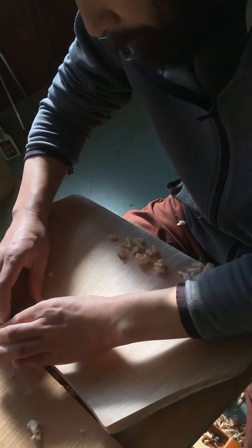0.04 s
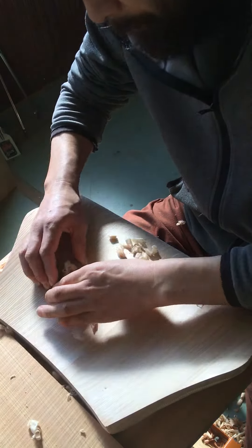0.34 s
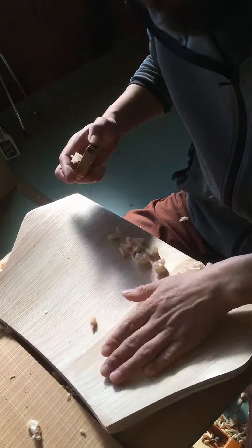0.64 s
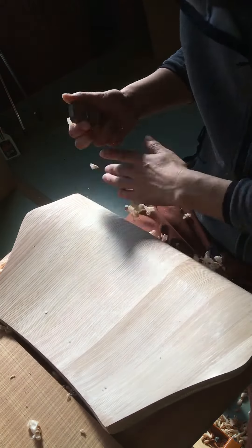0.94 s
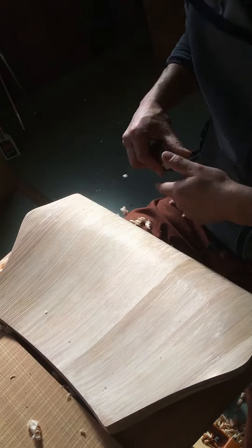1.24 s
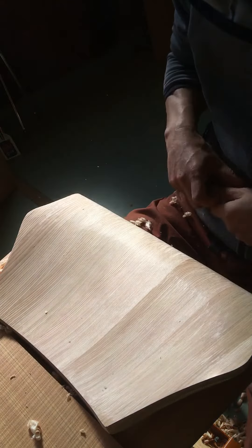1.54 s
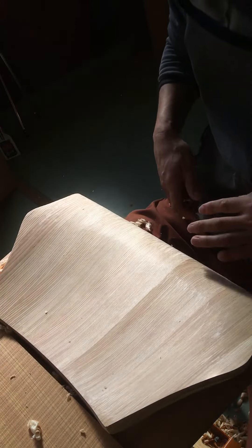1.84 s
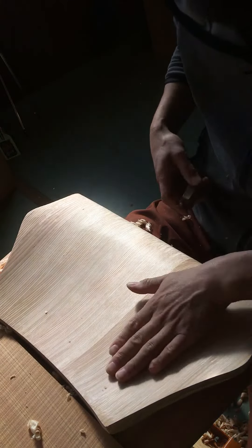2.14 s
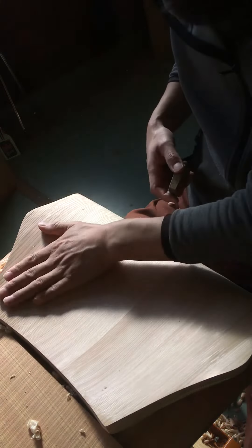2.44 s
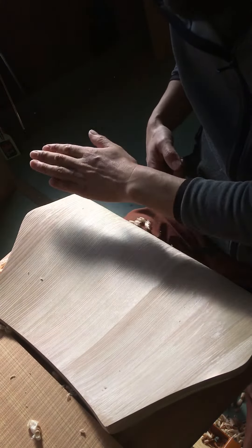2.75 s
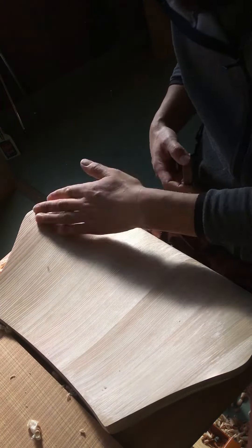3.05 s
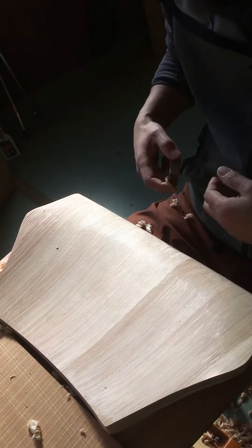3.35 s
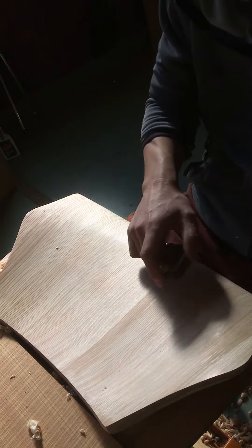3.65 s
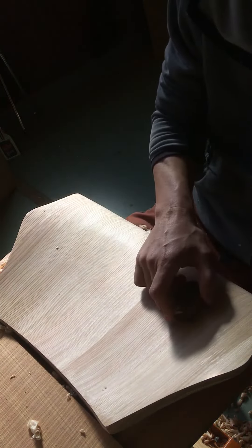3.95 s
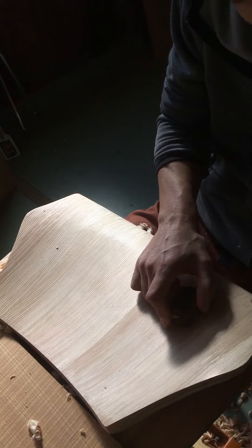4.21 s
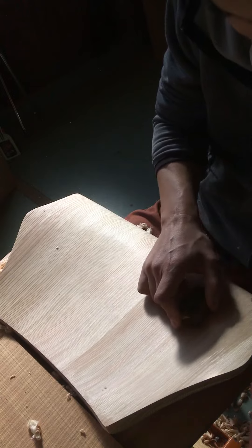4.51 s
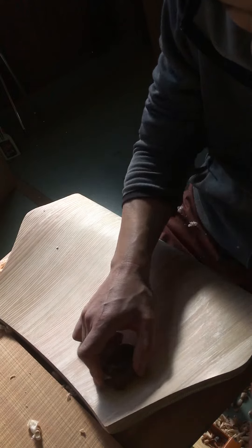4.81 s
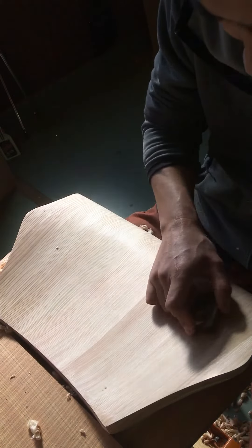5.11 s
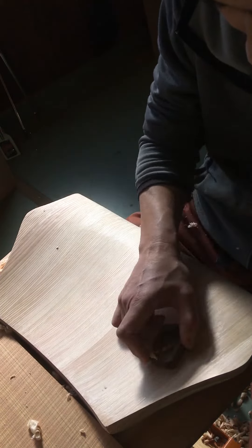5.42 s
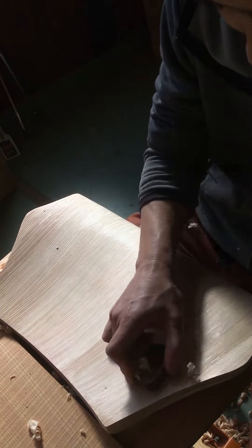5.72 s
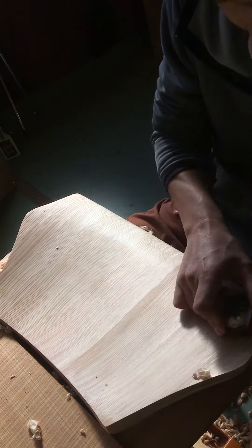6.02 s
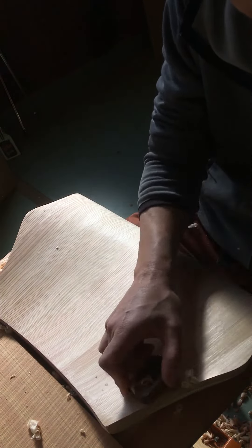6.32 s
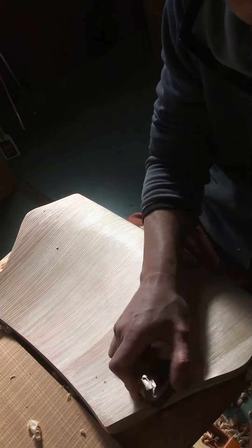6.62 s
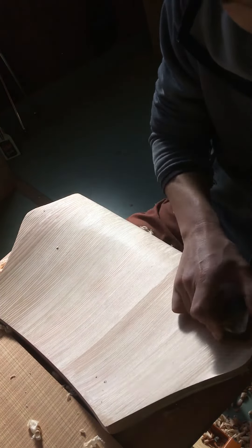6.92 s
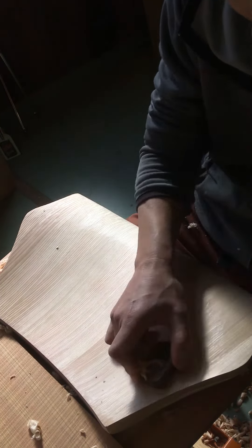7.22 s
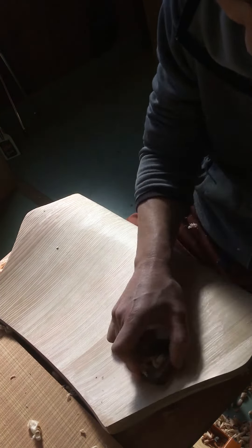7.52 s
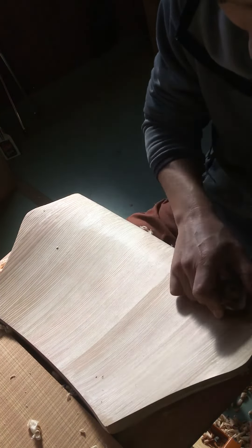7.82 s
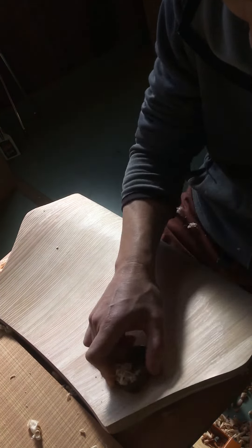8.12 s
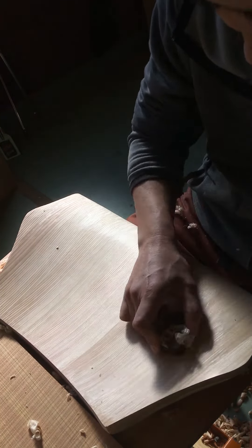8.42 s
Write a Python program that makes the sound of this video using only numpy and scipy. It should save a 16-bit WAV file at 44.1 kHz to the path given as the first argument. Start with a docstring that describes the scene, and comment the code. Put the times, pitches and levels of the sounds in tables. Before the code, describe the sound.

In a quiet workshop, a small hand plane makes a few light, squeaky scrapes on a thin wooden plate. A woody knock follows, and a hand wipes shavings off with two soft hisses. After faint scrapes and taps, the plane works back and forth about twice a second, each push crisply tearing fibres and each return rubbing with a hollow tone. Everything is heard close.

```python
"""A thumb plane hollows a thin carved wooden plate in a quiet workshop, heard close.
Light rim scrapes rasp and squeak. A hand pats the plate, wipes it and gathers the shavings.
The plane settles with faint scrapes, then from 4.3 s works to and fro about twice a second:
each push tears fibres and rings blade and plate, each return drags the sole under the cupped hand."""
import sys
import numpy as np
from scipy import signal
from scipy.fft import rfft, irfft, next_fast_len
from scipy.io import wavfile
from scipy.ndimage import uniform_filter1d, map_coordinates

SR = 44100
rng = np.random.default_rng(int(sys.argv[2]) if len(sys.argv) > 2 else 0)


def transcribe(u):
    """Save the signal u as a 16-bit wav file named by the first command-line argument.

    u: samples, shape (n,) or (channels, n), limited to [-1, 1]; the rate is SR.
    q: integer samples, one column per channel.
    """
    v = np.clip(np.atleast_2d(u).T, -1, 1)
    q = np.round(v * 32767).astype(np.int16)
    wavfile.write(sys.argv[1], SR, q)


N = 373086
TIME = np.arange(N) / SR
SIZE = next_fast_len(N + SR)
HZ = np.fft.rfftfreq(SIZE, 1 / SR)

# rim scrapes, then the plane settling: start_s, rise_s, hold_s, fall_s, rasp_db, drag_db
SCRAPES = [(0.0, .004, .105, .06, -64, -58), (.179, .025, .1, .15, -48, -51.5),
           (.36, .035, .018, .055, -56.5, -49.5), (3.295, .042, .08, .14, -70, -71.5),
           (3.568, .036, .096, .2, -75, -76), (3.759, .06, .032, .2, -64.5, -64.5),
           (3.93, .085, .022, .03, -65, -64), (4.127, .058, .04, .058, -71.5, -70)]
SCRAPE_ENTRY_DB = 7
# plate resonances under the tool: centre_hz, width_hz, gain_db
PLATE_MODES = [(453, 28, -2.5), (706, 19, -2.5), (1000, 70, -3), (1119, 20, 0.5), (1612, 50, -0.5),
               (2128, 65, -3), (2726, 246, -13)]
# flexing modes of the whole plate: pitch_hz, gain_db, t60_s
FLEX_MODES = [(63, -6, 0.45), (80.5, 3, 0.36), (101.6, -1, 0.23), (114.6, -5.5, .35), (138, -9, .25),
              (175.7, -9.5, 0.46), (217, -6, 0.41), (236, -7, 0.3), (312, -8, 0.16), (462, -12.5, 0.23)]
# blade resonances: centre_hz, width_hz, gain_db
BLADE_MODES = [(4715, 50, -13), (7085, 240, 1), (11400, 1700, -12)]
# pushes of the plane: start_s, dig_s, cut_s, tear_db, drag_db
PUSHES = [(4.511, .19, .028, -51.5, -52), (5.146, .08, .005, -44.5, -48.5),
          (5.623, .055, .04, -40.5, -49.5), (6.101, .05, .056, -39.5, -49), (6.569, .018, .048, -36, -49.5),
          (6.991, .085, .006, -41, -48.5), (7.46, .035, .045, -40, -49.5), (7.93, .045, .04, -42.5, -49),
          (8.387, .06, .05, -43.5, -47.5)]


def amp(db):
    """Decibels to gain."""
    return 10 ** (np.asarray(db) / 20)


def unit(x):
    """Scale to rms 1."""
    return x / np.sqrt(np.mean(x ** 2) + 1e-20)


def filtered(x, response):
    """Apply a frequency response."""
    return irfft(rfft(x, SIZE) * response, SIZE)[:N]


def passed(x, response):
    """Filter, keeping the power of a white input."""
    return filtered(x, response / np.sqrt(np.mean(abs(response) ** 2)))


def colour(points):
    """Minimum-phase response through (freq_hz, gain_db) points."""
    hz, db = np.transpose(points)
    cepstrum = irfft(np.log(amp(np.interp(np.log(HZ + 1), np.log(hz), db))), SIZE)
    cepstrum[1:SIZE // 2] *= 2
    cepstrum[SIZE // 2 + 1:] = 0
    return np.exp(rfft(cepstrum))


def resonances(modes):
    """Response of (centre_hz, width_hz, gain_db) band-passes, alternating in sign."""
    return sum((-1) ** k * amp(db) * 1j * HZ * width / (hz * hz - HZ ** 2 + 1j * HZ * width)
               for k, (hz, width, db) in enumerate(modes))


def wobble(rate_hz):
    """Random curve, linear between knots."""
    return map_coordinates(rng.standard_normal(int(N * rate_hz / SR) + 4), [TIME * rate_hz], order=1)


def envelope(strokes, entry_db, curve=1, edge_s=.008):
    """Stroke gain: enter entry_db low, swell, hold, lose 20 dB per fall_s."""
    power, t = np.zeros(N + SR), np.arange(SR) / SR
    for start_s, rise_s, hold_s, fall_s, level_db in strokes:
        swell_db = -entry_db * np.maximum(1 - t / rise_s, 0) ** curve
        fade_db = -20 * np.maximum(t - rise_s - hold_s, 0) / fall_s
        onset = np.minimum(t / edge_s, 1)
        power[max(round(start_s * SR), 0):][:SR] += amp(level_db + swell_db + fade_db) ** 2 * onset
    return np.sqrt(power[:N])


def grains(rate_hz, spread_db):
    """Tiny slips or breaks, random in time and size."""
    impulses = (rng.random(N) < rate_hz / SR) * np.sign(rng.standard_normal(N))
    return unit(impulses * amp(spread_db * rng.standard_normal(N)))


def bursts(rows):
    """Decaying noise bursts."""
    out, t = np.zeros(N + SR), np.arange(SR // 2) / SR
    for start_s, level_db, t60_s in rows:
        out[round(start_s * SR):][:len(t)] += amp(level_db - 60 * t / t60_s) * rng.standard_normal(len(t))
    return out[:N]


def background(air_db=-69, hum_waver_db=1.5):
    """Still workshop air, faint mains hum."""
    # air spectrum: freq_hz, gain_db
    air_colour = [(12, -36), (20, -14), (65, -2.5), (88, -13.5), (181, -17), (209, -26.5), (240, -19),
                  (456, -26), (524, -26.5), (15800, -34.5)]
    # hum partials: pitch_hz, level_db
    partials = [(60, -80.5), (180, -84)]
    hum = sum(amp(db) * np.sqrt(2) * np.sin(2 * np.pi * hz * TIME) for hz, db in partials)
    air = unit(filtered(rng.standard_normal(N), colour(air_colour)))
    return amp(air_db) * air + hum * amp(hum_waver_db * wobble(5))


def rim_scrape(clump_db=1.9):
    """A shallow scrape rasps without taking a full shaving."""
    # rasp spectrum: freq_hz, gain_db
    rasp_colour = [(1180, -38), (2200, -5.5), (4000, -2), (4630, -8.5), (5220, -5), (7010, 0), (8260, -4.5),
                   (14400, -6), (15800, -14)]
    fibres = unit(filtered(grains(6000, spread_db=1.5), colour(rasp_colour)))
    pressure = envelope([(*timing, db) for *timing, db, _ in SCRAPES], SCRAPE_ENTRY_DB)
    return pressure * amp(clump_db * wobble(150)) * fibres


def push_force(run_on_s=.033, brake_s=.104):
    """Each push loads the plate a little past the cut, then the arm brakes."""
    strokes = [(s, dig, cut + run_on_s, brake_s, db) for s, dig, cut, _, db in PUSHES]
    return envelope(strokes, entry_db=5.5)


def plate_drag(ring_db=-2.7, rub_db=-2.4, judder_db=2):
    """The edge drags over the grain and shakes the plate."""
    # drag spectrum: freq_hz, gain_db
    drag_colour = [(40, -24), (90, -3), (140, -9.5), (220, -5), (340, -7.5), (450, -11.5), (540, -8.5),
                   (1080, -5), (1600, -6.5), (2300, -7), (3500, -17), (4500, -11), (6500, -36.5)]
    scrape_force = envelope([(*timing, db) for *timing, _, db in SCRAPES], SCRAPE_ENTRY_DB)
    force = (push_force() + scrape_force) * amp(judder_db * wobble(130))
    ring = passed(force * grains(2500, spread_db=3.5), resonances(PLATE_MODES))
    rub = passed(force * grains(2500, spread_db=3.5), colour(drag_colour))
    return amp(ring_db) * ring + amp(rub_db) * rub


def squeaks_and_hoots(trim_db=-1.5, waver=.09, rough_db=3):
    """Rough, gliding tones that swell and fade: tool squeaks, hollow hoots from the cupped hand."""
    # squeaks and hoots: middle_s, length_s, start_hz, end_hz, level_db
    glides = [(0.051, 0.097, 1560, 1440, -55), (0.256, .07, 4000, 3820, -47),
              (0.39, 0.055, 2300, 2160, -52), (5.039, 0.072, 1687, 1590, -51),
              (5.465, .13, 681, 737, -45.5), (5.943, .07, 806, 650, -47.5), (6.355, .035, 700, 740, -56),
              (6.395, .06, 1040, 1136, -44), (6.584, 0.014, 7000, 5140, -43),
              (6.585, 0.014, 5000, 4700, -35.5), (6.62, .03, 4720, 4720, -50), (6.795, .04, 603, 644, -54),
              (6.84, .05, 805, 710, -49.5), (7.251, 0.034, 790, 740, -46.5), (7.295, 0.045, 796, 944, -47),
              (7.763, 0.096, 850, 742, -51.5), (8.0, .1, 952, 973, -54), (8.207, .04, 727, 713, -50)]
    out = np.zeros(N)
    jitter, roughness = wobble(500), amp(rough_db * wobble(220))
    for middle_s, length_s, start_hz, end_hz, level_db in glides:
        on = abs(TIME - middle_s) < length_s / 2
        progress = (TIME[on] - middle_s) / length_s + .5
        pitch_hz = start_hz + (end_hz - start_hz) * progress
        pitch_hz += waver * np.sqrt(pitch_hz * 2500) * jitter[on]  # low hoots are least steady
        tone = np.sin(2 * np.pi * np.cumsum(pitch_hz) / SR)
        out[on] += amp(level_db + trim_db) * np.sin(np.pi * progress) * roughness[on] * tone
    return out


def knocks(knock_trim_db=-9, thump_trim_db=-4, attack_s=.007):
    """Hand or tool lands: a woody knock, and a thump as the plate flexes."""
    # landings: start_s, knock_db, thump_db, knock_t60_s
    landings = [(0.66, -34, -52, 0.045), (0.671, -23, -44, 0.048), (2.069, -55.5, -49, 0.15),
                (2.887, -46, -54.5, 0.047), (2.985, -48.5, -47.5, 0.068), (3.885, -36.5, -68, 0.057),
                (4.07, -47.5, -74, 0.06), (4.351, -51, -86, 0.03), (4.519, -43, -89, 0.04),
                (5.359, -44, -78, 0.064), (6.385, -40, -65, 0.03), (7.744, -38, -66, 0.034)]
    # knock spectrum: freq_hz, gain_db
    knock_colour = [(120, -17), (320, -2.5), (450, -0.5), (620, -3.5), (830, -3), (1000, 1), (1150, 0),
                    (1350, -8), (2200, -14), (3500, -26), (9000, -37)]
    thump, t = np.zeros(N + SR), np.arange(SR) / SR
    onset = 1 - np.exp(-t / attack_s)
    for start_s, _, thump_db, _ in landings:
        for hz, db, t60_s in FLEX_MODES:
            decay = amp(db + rng.standard_normal() - 60 * t / t60_s)
            mode = decay * np.sin(2 * np.pi * (hz * t + rng.random()))
            thump[round(start_s * SR):][:SR] += amp(thump_db + thump_trim_db) * mode * onset
    impacts = bursts([(s, db + knock_trim_db, t60_s) for s, db, _, t60_s in landings])
    return thump[:N] + passed(impacts, colour(knock_colour))


def flexing():
    """Low plate modes under a rubbing load, rms 1."""
    modes = [(hz, np.log(1000) / np.pi / t60_s, db) for hz, db, t60_s in FLEX_MODES]
    return unit(filtered(rng.standard_normal(N), resonances(modes)))


def wiping(flutter_db=1.14, flex_db=-18):
    """Skin on smooth wood hisses and gently stirs the plate."""
    # hand over plate and shavings: start_s, rise_s, hold_s, fall_s, level_db
    wipes = [(.703, .118, .049, .115, -44), (1.5, .095, .024, .06, -69), (1.686, .04, .023, .08, -71),
             (2.058, .014, .02, .18, -57), (2.09, .175, .28, .085, -48), (2.977, .029, .04, .09, -53.5)]
    # hiss spectrum: freq_hz, gain_db
    skin_colour = [(59, -6), (100, -8), (156, -19.5), (228, -23.5), (797, -12.5), (985, -9.5),
                   (1240, -13.5), (1500, -7.5), (1780, -9), (2250, -6.5), (6770, -0.5), (13300, -1),
                   (15800, -13)]
    hiss = unit(filtered(rng.standard_normal(N), colour(skin_colour))) * amp(flutter_db * wobble(60))
    return envelope(wipes, entry_db=20.5) * (hiss + amp(flex_db) * flexing())


def dry_cracks(trim_db=-6, t60_s=.007):
    """Short dry cracks: shavings snap, and the sole clicks as it lands for a return."""
    # snaps and clicks: start_s, level_db
    cracks = [(1.1744, -34), (2.0734, -57), (4.137, -51), (6.384, -39), (6.785, -46), (6.828, -43),
              (8.238, -43)]
    # crack spectrum: freq_hz, gain_db
    crack_colour = [(900, -29), (1900, 1.5), (3000, -8), (5200, -0.5), (9000, -3.5), (15000, -9)]
    return passed(bursts([(s, db + trim_db, t60_s) for s, db in cracks]), colour(crack_colour))


def sole_gains(skim_s=.102, hold_s=.018, run_up_s=.051, run_up_fall_s=.04, run_up_db=-55.5):
    """Gains of rub and hollow tone: light skim, loaded return, run-up to the next bite."""
    # return strokes: start_s, rise_s, fall_s, rub_db, tone_db
    returns = [(4.29, .067, .14, -71, -59), (4.9, .11, .09, -58, -55), (5.39, .065, .135, -54, -51.5),
               (5.902, .04, .13, -50.5, -50.5), (6.372, .012, .14, -49, -52.5),
               (6.812, .018, .13, -50, -52), (7.221, .055, .12, -50, -51), (7.738, .006, .13, -50, -51),
               (8.226, .008, .1, -50, -52)]
    rubs, tones = [], []
    for start_s, rise_s, fall_s, rub_db, tone_db in returns:
        skim = (start_s + rise_s - skim_s, skim_s / 2, skim_s / 2, fall_s)
        loaded = (start_s, rise_s, hold_s, fall_s)
        rubs += [(*skim, rub_db - 12), (*loaded, rub_db)]
        tones += [(*skim, tone_db - 7.5), (*loaded, tone_db)]
    tones += [(s - run_up_s, run_up_s, 0, run_up_fall_s, run_up_db) for s, *_ in PUSHES]
    contact = amp(-70) * (TIME > 4.8)  # once under way, the sole stays on the wood
    return np.hypot(envelope(rubs, entry_db=12), contact), envelope(tones, entry_db=13, edge_s=.02)


def returning(ring_db=-8, hollow_db=-3.5, hollow_hz=1000, stage_width_hz=380, judder_db=2):
    """The sole skids back, ringing blade and plate; the cupped hand resonates."""
    # rub spectrum: freq_hz, gain_db
    sole_colour = [(60, -10), (220, 3), (340, -8.5), (600, -1), (1400, -4), (1700, 0), (2500, -1.5),
                   (3400, -11.5), (5500, -14.5), (9000, -13.5), (11800, -14.5), (13200, -20), (15800, -21)]
    rub_gain, tone_gain = sole_gains()
    slips = rub_gain * amp(judder_db * wobble(90)) * grains(7000, spread_db=2.5)
    rub = passed(slips, colour(sole_colour))
    ring = passed(slips, resonances(BLADE_MODES)) + passed(slips, resonances(PLATE_MODES))
    cupped_hand = resonances([(hollow_hz, stage_width_hz, 0)]) ** 2
    hollow = unit(filtered(grains(4000, spread_db=2.5), cupped_hand))
    return rub + amp(ring_db) * ring + amp(hollow_db) * tone_gain * hollow


def cutting(ring_db=-3, tear_db=-4.3, chatter_db=3, clump_db=2.8, graze_db=-10, flex_db=-21,
            fall_s=.056, catch_trim_db=-8, catch_t60_s=.025):
    """Breaking fibres crackle and ring the blade; the bite flexes the plate."""
    # blade catching on hard grain: start_s, level_db
    hard_grain = [(5.7149, -30), (5.752, -34), (6.183, -28), (6.204, -30), (6.5978, -29), (6.626, -26.5),
                  (6.6434, -30), (7.0401, -24), (7.065, -26)]
    # tearing spectrum: freq_hz, gain_db
    tear_colour = [(2000, -37), (4000, -23), (6000, -19), (8500, -23), (10500, -10.5), (12400, -11.5),
                   (13600, -16), (15800, -25)]
    cuts = [(s, dig, cut, fall_s, db) for s, dig, cut, db, _ in PUSHES]
    shaving = envelope(cuts, entry_db=12, curve=1.7)  # digs in fastest at first
    bite = np.hypot(shaving, amp(graze_db) * push_force())
    chatter = bite * grains(4000, spread_db=1.5) * amp(ring_db + chatter_db * wobble(170))
    catches = bursts([(s, db + catch_trim_db, catch_t60_s) for s, db in hard_grain])
    tearing = bite * grains(6000, spread_db=3) * amp(tear_db + clump_db * wobble(120))
    ring = passed(chatter + catches, resonances(BLADE_MODES))
    return ring + passed(tearing, colour(tear_colour)) + amp(flex_db) * bite * flexing()


def moving_contact(x, depth_db=2.9, rate_hz=14, patch_sqrt_hz=3.204):
    """The travelling contact point drives resonances more and less strongly by turns."""
    hz, t, spectra = signal.stft(x, SR, nperseg=512)
    grid = np.meshgrid(np.sqrt(hz) / patch_sqrt_hz, t * rate_hz, indexing="ij")
    weight = amp(depth_db * map_coordinates(rng.standard_normal((300, 400)), grid, mode="wrap"))
    weight /= np.sqrt(uniform_filter1d(weight ** 2, size=40, axis=0))  # energy shifts between near bands
    return signal.istft(spectra * weight, SR, nperseg=512)[1][:N]


def walls(x, wet_db=-15, cutoff_hz=1500, t60_s=.25, delay_s=.003):
    """Short, dull reflections from bench and walls."""
    t = np.arange(SR // 2) / SR
    tail = rng.standard_normal(len(t)) * amp(-60 * t / t60_s) * (t > delay_s)
    reflections = signal.fftconvolve(x, tail / np.linalg.norm(tail))[:N]
    return amp(wet_db) * filtered(reflections, 1 / (1 + 1j * HZ / cutoff_hz))


def scene():
    """Tool, hand and room, the same in both channels."""
    tool = moving_contact(plate_drag() + cutting() + rim_scrape() + returning()) + squeaks_and_hoots()
    work = tool + wiping() + knocks() + dry_cracks()
    mono = work + walls(work) + background()
    return np.array([mono, mono])


def record(dry):
    """Brick-wall low-pass at 15.8 kHz."""
    return np.array([filtered(channel, HZ < 15800) for channel in dry])


dry = scene()
out = record(dry)
transcribe(out)
```